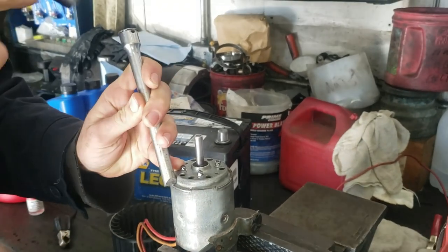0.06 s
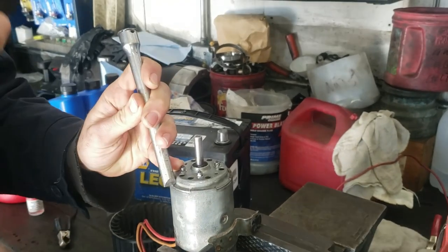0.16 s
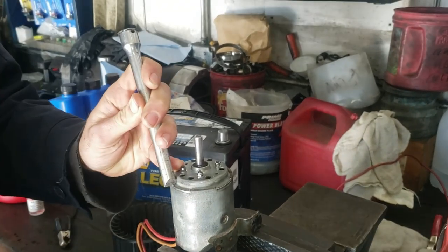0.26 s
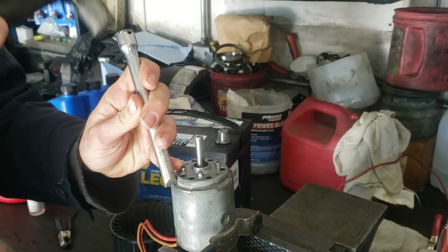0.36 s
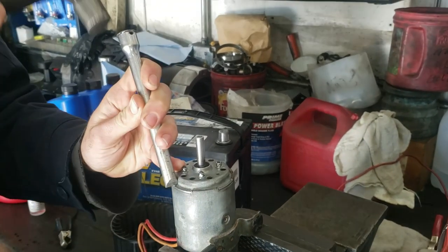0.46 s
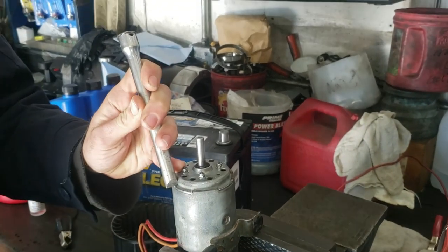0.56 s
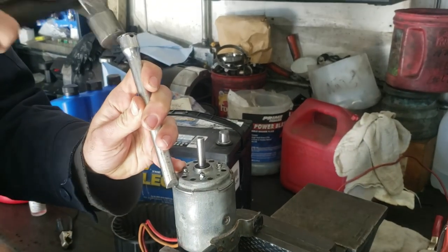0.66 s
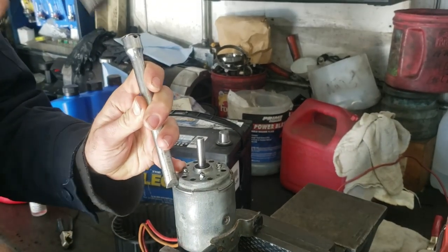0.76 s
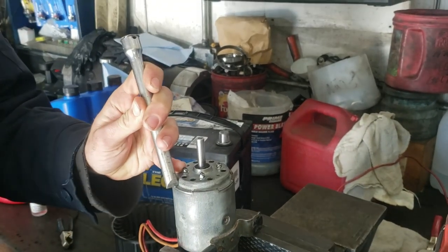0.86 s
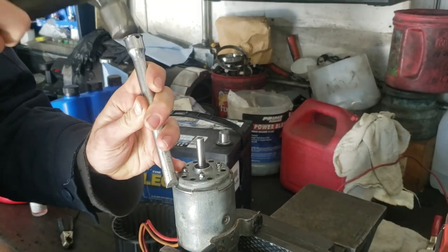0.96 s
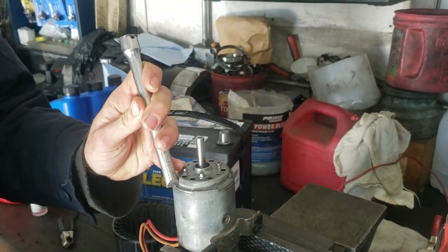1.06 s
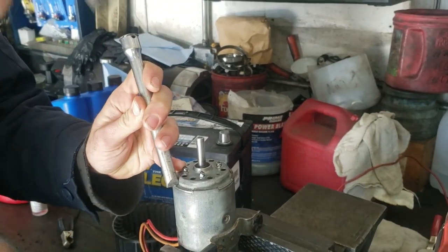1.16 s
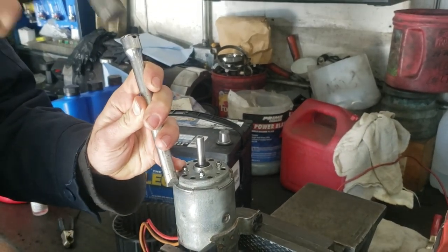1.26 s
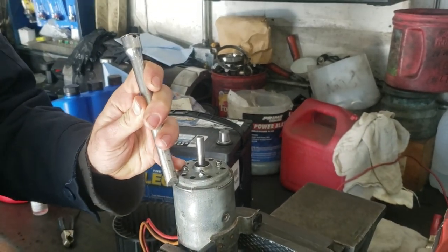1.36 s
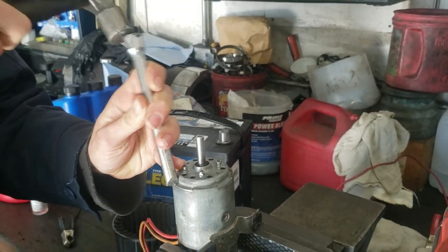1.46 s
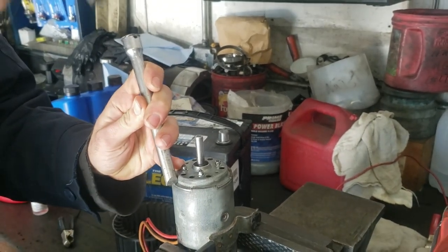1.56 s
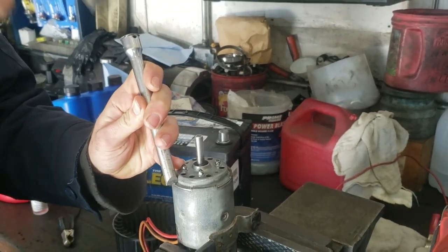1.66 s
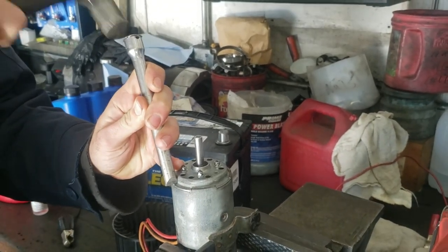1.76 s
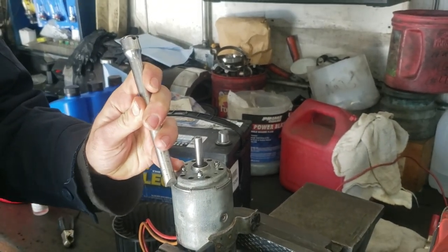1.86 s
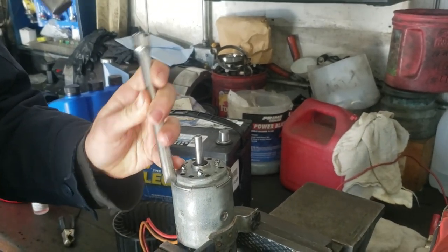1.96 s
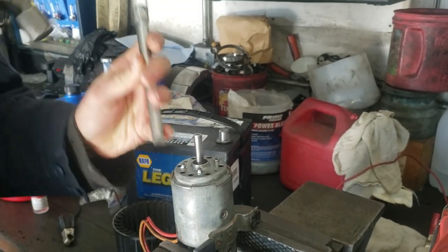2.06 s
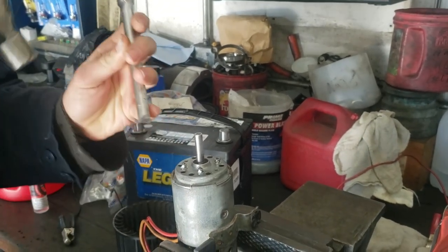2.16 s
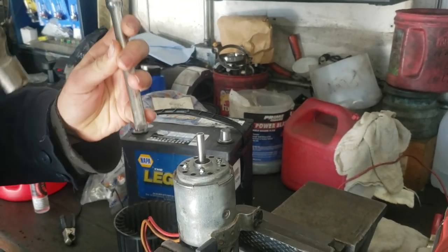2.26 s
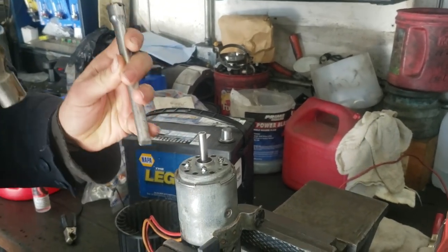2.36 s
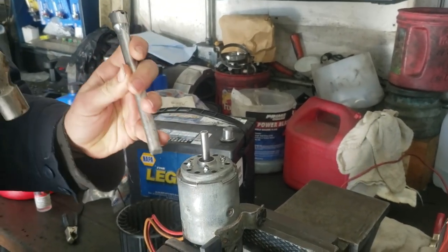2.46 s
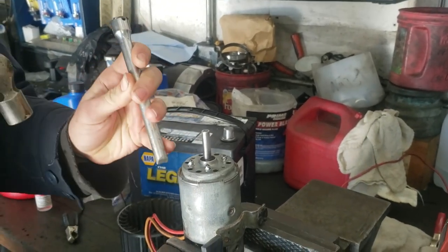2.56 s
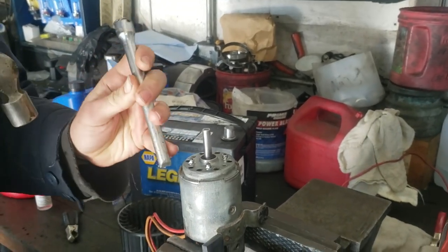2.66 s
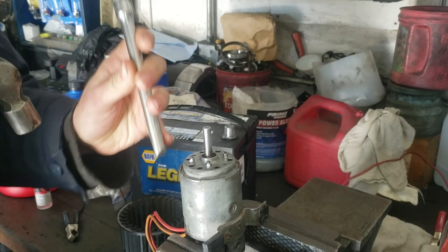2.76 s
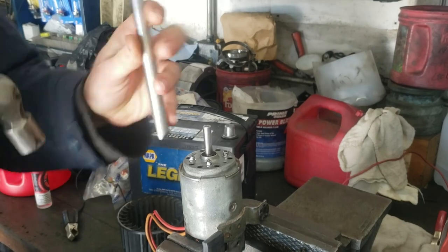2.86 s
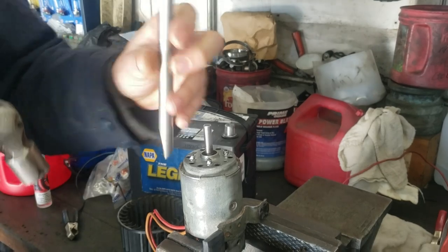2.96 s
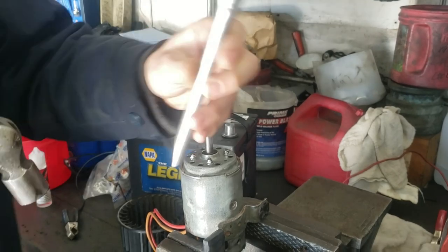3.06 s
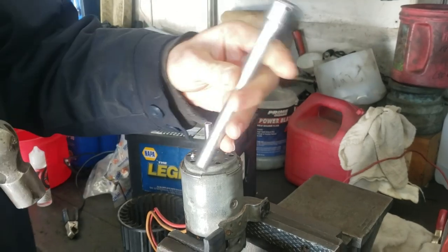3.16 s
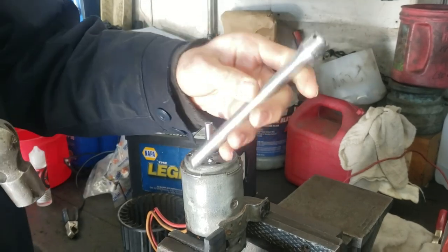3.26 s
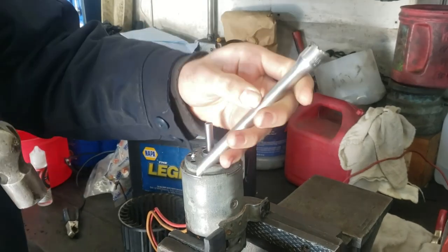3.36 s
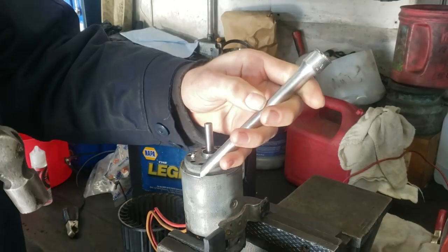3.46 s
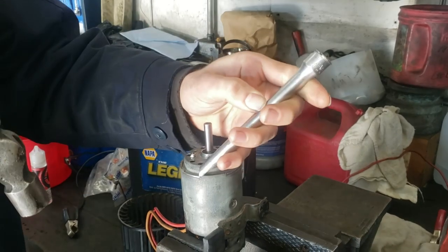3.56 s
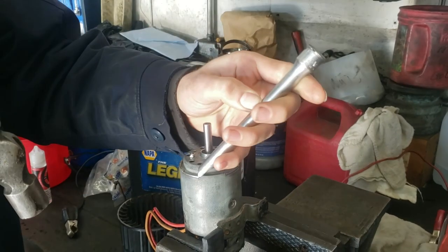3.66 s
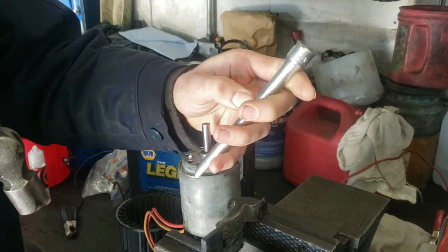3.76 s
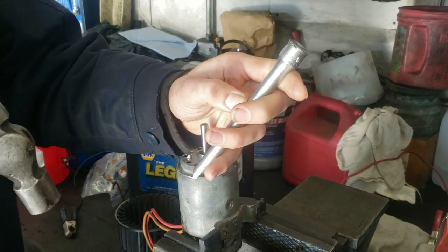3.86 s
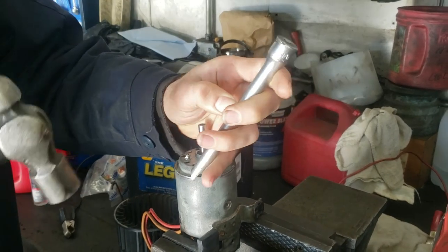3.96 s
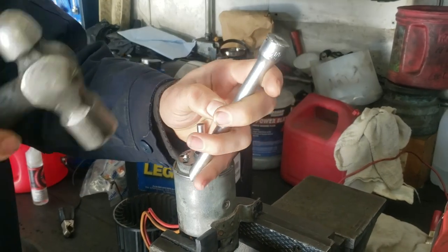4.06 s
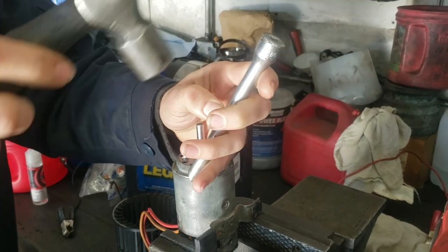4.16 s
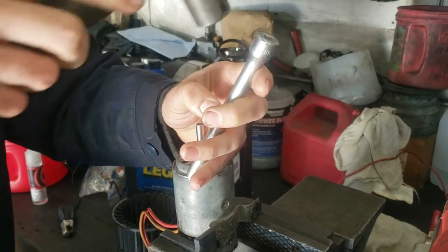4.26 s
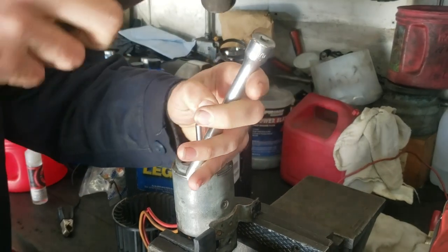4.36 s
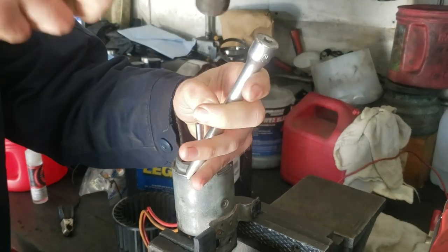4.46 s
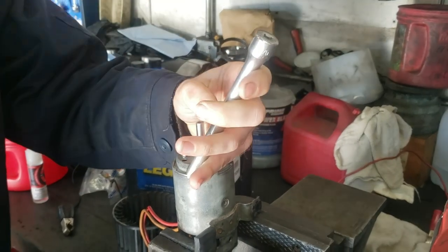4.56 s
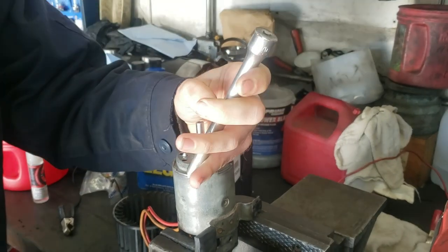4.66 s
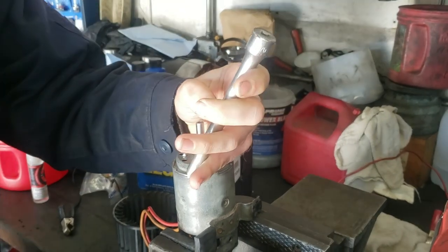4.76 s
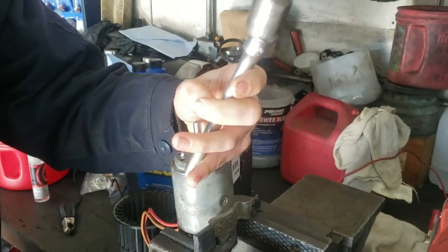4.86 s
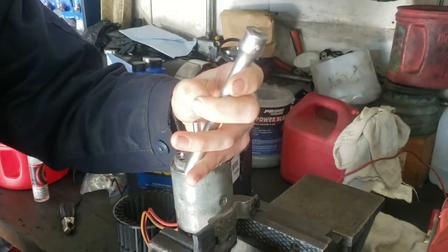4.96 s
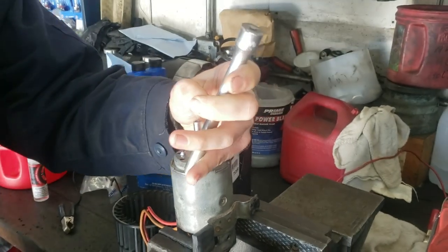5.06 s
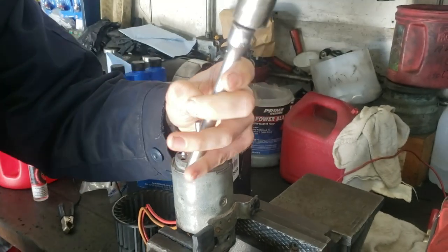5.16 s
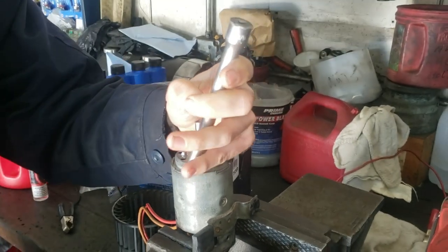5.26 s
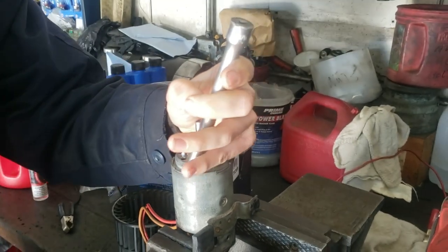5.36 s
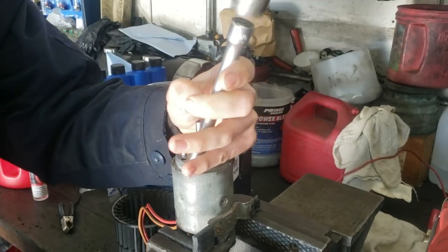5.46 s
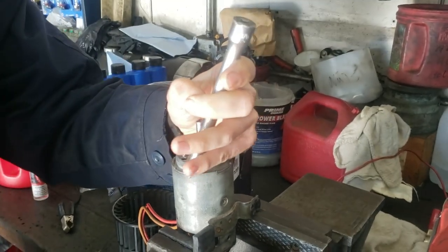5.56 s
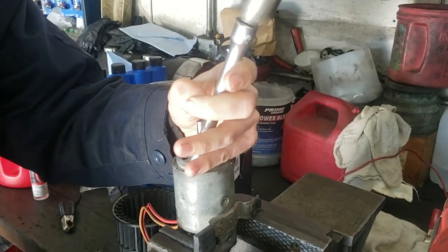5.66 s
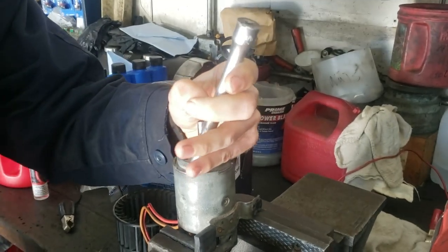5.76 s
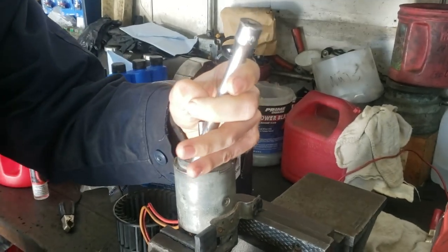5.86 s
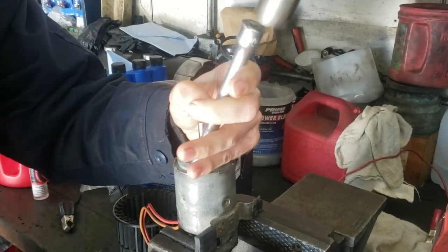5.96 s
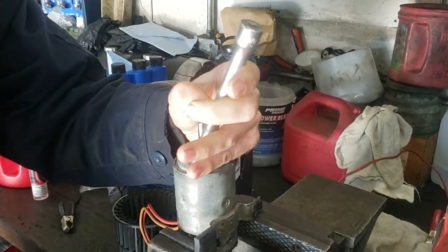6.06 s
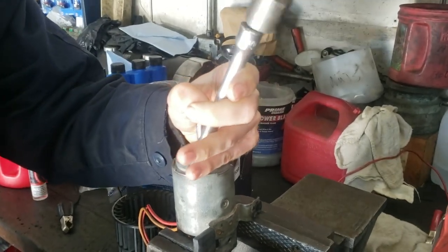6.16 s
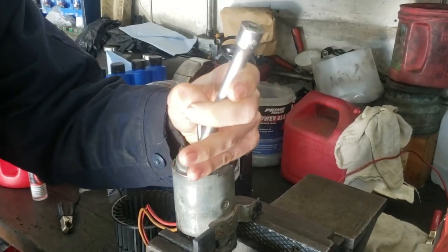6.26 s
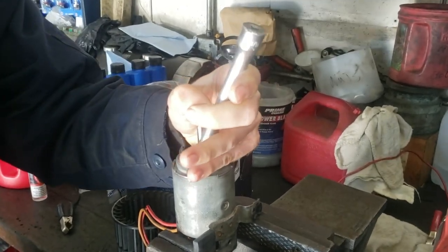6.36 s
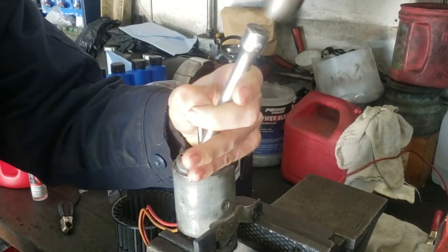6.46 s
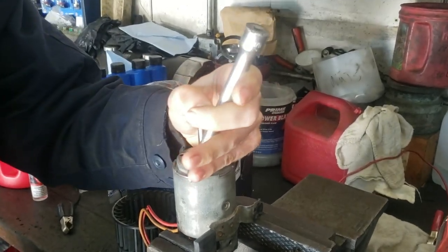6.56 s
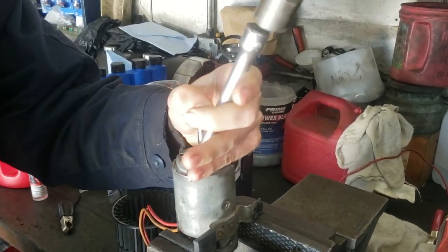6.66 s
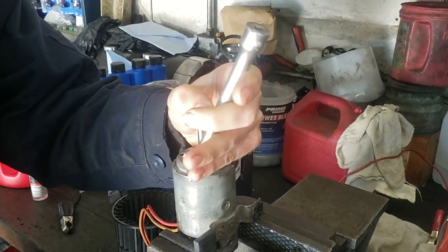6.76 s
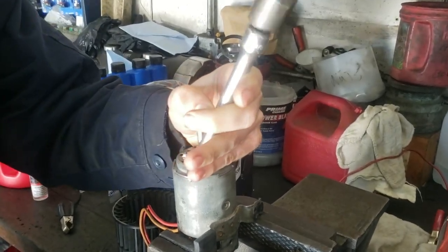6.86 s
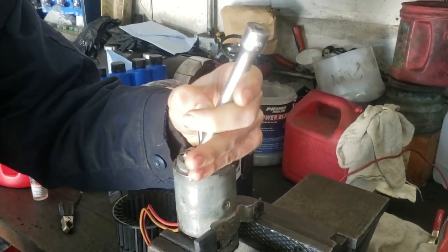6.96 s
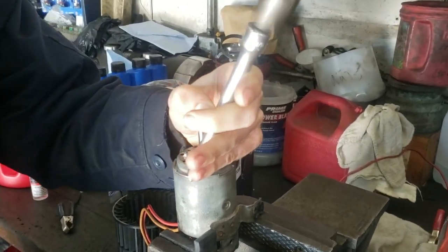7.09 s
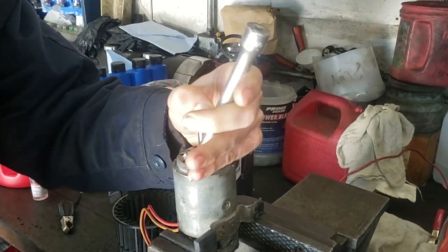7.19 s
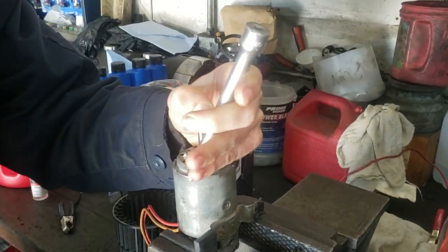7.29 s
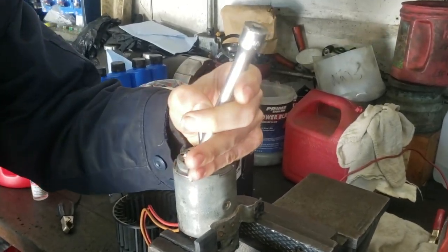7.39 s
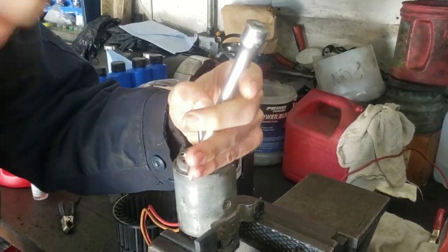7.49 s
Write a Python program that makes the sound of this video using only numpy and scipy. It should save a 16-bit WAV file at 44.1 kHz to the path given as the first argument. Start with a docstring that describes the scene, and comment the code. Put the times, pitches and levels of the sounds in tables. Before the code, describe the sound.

A hammer strikes a hand-held steel punch in two brisk runs, bright cracks with short rings and dull bench thuds, over faint hum and traffic rush.

```python
"""A hammer taps a hand-held punch, closing two tabs on a motor housing clamped in a vice.
Each blow is a noise burst at contact, dying sines for steel, vice and bench, and scatter off the room;
a tab that still gives buzzes and cushions the bench thud. Between the two runs the punch clicks onto the
next tab. Filtered noise makes the sleeve, stirred air, shop air and a distant rush like passing traffic,
which swells and fades; wavering sines make a machine's hum."""
import sys
import numpy as np
from scipy import signal
from scipy.io import wavfile
from scipy.ndimage import uniform_filter1d, minimum_filter1d

SR = 44100
rng = np.random.default_rng(int(sys.argv[2]) if len(sys.argv) > 2 else 0)


def pcm_store(signal):
    """Save signal as 16-bit PCM."""
    levels = np.round(np.clip(np.atleast_2d(signal), -1, 1) * 32767)
    wavfile.write(sys.argv[1], SR, levels.astype(np.int16).T)


N = 332073

# hammer blows: t/s, force/dB, give of tab/0-1, off-centre/0-1, punch ring left by the grip/dB
BLOWS = [ (0.445, -6.5, 0.96, 0, -6), (0.7241, -1, .4, 0.12, -13), (0.9923, -0.5, 0.13, 0.2, -24.5),
         (1.2591, -1, .1, 0.11, -18.5), (1.517, -0.5, 0.12, 0.07, -21), (1.757, -1, 0, 0.01, -17.5),
         (4.8650, 0, 0.46, .4, 2), (5.1996, -2, 0, 0.9, -24), (5.4734, -1.5, 0.1, 0, -6),
         (5.7263, 0, 0.19, 0.21, -10), (5.9664, -0.4, 0, 0.05, -13.5), (6.2142, -2.5, 0.08, 0.02, -24),
         (6.4510, -1.5, 0.29, 0.1, -13), (6.6818, 0, 0.33, 0.2, -21), (6.9157, 0, 0.32, 0.17, -12),
         (7.159, 0.2, 0.1, 0.08, -24)]
LEAN_S = 3.0  # from here on the punch leans, on the second tab
# crack spectrum, punch upright and leaning: f/Hz, level/dB
UPRIGHT = [(40, -4), (150, -0.5), (420, 2.5), (620, -5.5), (1500, -3), (3300, 1), (4300, 4.5), (5200, -1.5),
           (7300, 3), (8600, -1), (10300, 3.5), (12300, 4.5), (13500, -1.5), (16000, -17.5)]
LEANING = [(40, -26), (150, 0), (450, 0), (750, -11), (1300, -10), (2000, -7.5), (3500, -4), (5400, -10.5),
           (7300, -3), (8600, -21), (10300, -8.5), (11800, -4), (13300, -5), (16000, -38.5)]
CHATTER_T60_S = 0.012
# direct path of the crack to the two microphones: f/Hz, left/dB, right/dB
DIRECT = [(100, -17, -3), (600, -7.5, 5.5), (2000, -1.5, 10), (4200, -3.5, 18), (5140, 3, 11),
          (7060, 5.5, 10.5), (9000, 3, -4), (10950, 13.5, 23), (11500, 7, 15), (15000, 9, 10)]
# hammer modes, before the loss to the tab: f/Hz, level/dB, t60/s
HAMMER = [(10145, 0, 0.021), (10460, -4.5, .012), (10100, -28.5, 0.38), (10300, -35, .28),
          (10680, -7.5, .007)]
# punch modes: f/Hz, level/dB, t60/s
PUNCH = [(3190, -20.5, 0.025), (4840, -29.5, 0.019), (6300, -24, 0.022), (7070, -24.5, 0.025),
         (12240, -7.5, 0.0075), (11970, -32, 0.21)]
# housing modes: f/Hz, level/dB, t60/s
HOUSING = [(3360, -12.5, 0.0067), (3400, -18, 0.013), (3658, -11.5, 0.018), (4070, -10, 0.0067),
           (3180, -42.5, 0.27), (7570, -17, 0.0037), (7774, -11.5, 0.009)]
# tab modes: f/Hz, level/dB, t60/s
TAB = [(1110, -34, 0.047), (1840, -33.5, 0.019), (1922, -31.5, 0.031), (2023, -21, 0.026),
       (2290, -12.5, 0.021), (2200, -25.5, 0.017), (2478, -28.5, 0.005), (2970, -29.5, .015)]
# vice modes: f/Hz, level/dB, t60/s
VICE = [(167, -47.5, 0.11), (210.3, -44.5, 0.11), (262.5, -52, 0.084), (440.6, -43.5, 0.29),
        (475, -45, .14), (562, -41, 0.11), (1062, -36.5, 0.035), (1263, -40, 0.069)]
# bench modes, before BENCH_LOSS_PER_S: f/Hz, level/dB, t60/s
BENCH = [(58.6, -40.5, .16), (85, -36.5, 0.37), (104.35, -34.5, 0.27), (131.5, -40.5, 0.088),
         (217.3, -41, 0.31)]
BENCH_LOSS_PER_S = 2.3  # 60 dB falls per second, from the hand pressing down
# drive of each part: square blow on a closed tab/dB, added by full give/dB, by fully off-centre/dB
RESPONSE = { "crack": (-0.75, -3, -0.5), "hammer": (-0.3, 0.5, -16), "housing": (-18.5, 7, 13.8),
            "tab": (-21, 28.7, -1), "bench": (0, -18, -14)}
# added drive of housing and bench by a leaning punch: level/dB
LEAN_DB = {"housing": 4.5, "bench": 4}
# punch tip touching the housing: t/s, click/dB, ring/dB, brightness/dB per octave
TOUCHES = [(2.039, -33, -11, -9), (3.289, -33, -31, 3), (3.455, -33, -1, -7), (3.516, -28.5, -9, -11.5),
           (3.840, -57, -33, -0.5), (4.164, -45, -30.5, 2), (4.271, -26.5, -20, -1.5)]
# tip click spectrum, before the brightness tilt: f/Hz, level/dB
TIP_CLICK = [(200, -5), (1200, -13), (2500, -5.5), (5500, 1.5), (8600, 2), (10800, 12.5), (13000, -6),
             (16000, -12)]
# tip ring modes, before the brightness tilt: f/Hz, level/dB, t60/s
TIP_RING = [(504, -57, 0.042), (1166, -59, 0.032), (1730, -70, .025), (2390, -53, 0.015),
            (3680, -58.5, 0.037), (6449, -51, 0.064), (7375, -60, 0.12), (8050, -68, 0.058),
            (12100, -39, .045)]
# decay of the room tail: f/Hz, t60/s
ROOM_T60 = [(100, 0.29), (500, 0.43), (2000, 0.67), (4000, 0.54), (8000, 0.43), (11000, 0.37),
            (15000, 0.24)]
# left-right likeness of diffuse sound: f/Hz, correlation/-1 to 1
LIKENESS = [(60, 0.88), (150, 0.94), (380, 0.61), (950, -0.21), (2380, 0.019), (5980, -0.12), (15000, 0.11)]
# shop air spectrum: f/Hz, relative level/dB per Hz
AIR = [(20, -31), (55, 1.5), (85, -6.5), (170, -5), (250, -10.5), (350, -5.5), (560, -14.5), (900, -13),
       (1600, -18), (3000, -36), (8600, -41), (10500, -41.5), (13000, -46), (16000, -58.5)]
AIR_DB = -59.5
# hum lines: f/Hz, relative level/dB
HUM = [(56.8, -9.5), (113.5, 3), (172.3, -7), (285.3, -10), (343, -17)]
# hum envelope: t/s, level/dB
HUM_DB = [(0, -66), (1.5, -59.5), (2.3, -55), (2.72, -64.5), (3.25, -54.5), (3.9, -59), (4.4, -48),
          (5.0, -63), (7.53, -66)]
# tyre rush spectrum: f/Hz, relative level/dB per Hz
RUSH = [(18, -35.5), (30, -11.5), (114, -11.5), (199, -6), (252, -13.5), (431, -10.5), (544, -16),
        (612, -11.5), (910, -7.5), (1070, -15.5), (1590, -15.5), (3070, -27), (8000, -43.5), (10400, -63.5),
        (17600, -120)]
# vehicle rumble spectrum: f/Hz, relative level/dB per Hz
RUMBLE = [(20, -17.5), (50, -1.5), (90, -3), (190, 0.5), (280, -13.5), (800, -57.5)]
# vehicles going by: nearest t/s, time to cover own distance/s, rush/dB, rumble/dB
PASSES = [(0.15, .6, -47, -47), (4.88, 0.57, -45.5, -57), (8.4, .6, -48.5, -67.5)]
RUSH_FALL_DB, RUMBLE_FALL_DB = 10, 7.5  # loss per doubling of distance
RUMBLE_LAG_S = 0.17  # exhaust trails behind
# sleeve spectrum: f/Hz, relative level/dB per Hz
SLEEVE = [(1000, -12), (3000, -11.5), (5500, -12.5), (7500, -6.5), (8600, -13), (10400, 2), (12000, -6.5),
          (15500, -18)]
# spectrum of air stirred by the arm: f/Hz, relative level/dB per Hz
DRAUGHT = [(15, -17.5), (32, -2), (52, -1.5), (75, -2.5), (130, -37.5), (400, -58)]
# arm movements: middle t/s, length/s, cloth/dB, stirred air/dB
MOVES = [(0.02, .14, -58.5, -68), (0.175, .2, -52, -49), (0.372, 0.16, -55, -45.5), (0.632, 0.33, -70, -50),
         (2.03, 0.46, -68, -64), (2.889, .24, -70, -74), (3.348, 0.25, -80, -58), (3.802, 0.39, -77, -58),
         (4.07, 0.15, -70, -73), (4.35, 0.49, -68, -59.5), (4.686, 0.36, -60.5, -60.5)]
SWING_LEAD_S, SWING_S, SWING_DB = 0.089, 0.29, -70.5  # sleeve brush ahead of every blow
CLOTH_REST_DB, DRAUGHT_REST_DB = -79.5, -74.5  # the arm is never quite still
EDGE_HZ = 16000


def amp(db):
    """Decibels to gain."""
    return 10 ** (np.asarray(db) / 20)


def evened(x):
    """Scales to rms 1."""
    return x / np.sqrt(np.mean(x ** 2) + 1e-20)


def read(points, hz):
    """Interpolates a curve on a log-frequency axis."""
    f, value = np.transpose(points)
    return np.interp(np.log(hz + 1), np.log(f + 1), value)


def level(points):
    """Turns a (t/s, level/dB) curve into a gain per sample."""
    return amp(np.interp(np.arange(N) / SR, *np.transpose(points)))


def swell(middle_s, length_s):
    """Bell-shaped gain, 1/e at the ends of its length."""
    offset = 2 * (np.arange(N) / SR - middle_s) / length_s
    return np.exp(-np.minimum(offset ** 2, 20))


def together(gains):
    """Unrelated sounds add in power."""
    return np.sqrt(sum(gain ** 2 for gain in gains))


def add(mix, s, sound):
    """Mixes a sound in at time s."""
    part = mix[..., round(s * SR):][..., :sound.shape[-1]]
    part += sound[..., :part.shape[-1]]


def colour(x, points, size=4096):
    """Minimum-phase filter to a given spectrum: causal, so attacks stay sharp."""
    hz = abs(np.fft.fftfreq(size, 1 / SR))
    log_gain = np.log(amp(read(points, hz)))
    transfer = np.exp(np.conj(signal.hilbert(log_gain)))
    taps = np.fft.ifft(transfer).real[:size // 2]
    return signal.oaconvolve(x, taps)[:len(x)]


def tilted(rows, tilt_db, pivot_hz=6000):
    """Tilts a spectrum or modes by so many dB an octave about the pivot, level below half of it."""
    return [(hz, db + tilt_db * np.log2(max(hz / pivot_hz, .5)), *rest) for hz, db, *rest in rows]


def damped(modes, loss_per_s):
    """Adds a loss, in 60 dB falls per second, to every mode."""
    return [(hz, db, 1 / (1 / t60 + loss_per_s)) for hz, db, t60 in modes]


def ring(modes, detune=0., uneven_db=0., size=16384):
    """Dying sines; grip and point of impact vary pitch and strength of each mode from call to call."""
    t = np.arange(size) / SR
    hz, db, t60 = np.transpose(modes)[..., None]
    shift, share = rng.standard_normal((2, len(modes), 1))
    envelope = amp(db + uneven_db * share - 60 * t / t60)
    tones = np.sin(2 * np.pi * hz * (1 + detune * shift) * t)
    return (envelope * tones).sum(0)


def burst(t60, chatter, size=2048):
    """Sharp first contact, then decaying noise as steel chatters on steel; energy 1."""
    x = rng.standard_normal(size) * amp(-60 * np.arange(size) / SR / t60)
    x = chatter * x / np.linalg.norm(x)
    x[0] = 1
    return x / np.linalg.norm(x)


def pair(a, b, hz):
    """Two spaced microphones share the bass of a diffuse sound but little of the treble."""
    same = np.clip(read(LIKENESS, hz), -1, 1)[:, None]
    return np.array([a, same * a + np.sqrt(1 - same ** 2) * b])


def noise(spectrum, patchy_db, size=2048):
    """Stereo noise of rms 1 with patches drifting over time and frequency."""
    hz = np.fft.rfftfreq(size, 1 / SR)
    a, b, c, d, patches = rng.standard_normal((5, len(hz), N * 4 // size + 5))
    patches = uniform_filter1d(patches, size=9, axis=0)
    patches = evened(uniform_filter1d(patches, size=5, axis=1))
    gain = amp(read(spectrum, hz)[:, None] + patchy_db * patches)
    z = pair(a + 1j * b, c + 1j * d, hz) * gain
    return evened(signal.istft(z, nperseg=size, noverlap=size - size // 4)[1][:, :N])


def workshop(x, clutter_db, tail_db, clutter_t60=0.071, first_s=0.0033, build_s=0.0074):
    """Quick scatter from the crowded bench, then the tail of the room, as decaying noise responses."""
    t = np.arange(SR) / SR
    hz, frame_s, z = signal.stft(rng.standard_normal((2, 2, SR)), SR, nperseg=256)
    near, far = pair(*z[0], hz), pair(*z[1], hz)
    far = far * amp(-60 * frame_s / read(ROOM_T60, hz)[:, None])
    near = signal.istft(near, SR)[1][:, :SR] * (t > first_s) * amp(-60 * t / clutter_t60)
    far = signal.istft(far, SR)[1][:, :SR] * (1 - np.exp(-t / build_s))
    response = (amp(clutter_db) * evened(near) + amp(tail_db) * evened(far)) / np.sqrt(SR)
    return signal.fftconvolve(x[None], response, axes=1)[:, :N]


def drive(part):
    """Drive of one part by each blow, in dB: force, give of the tab, aim and lean of the punch."""
    s, force_db, give, off_centre, _ = np.transpose(BLOWS)
    square_db, give_db, off_centre_db = RESPONSE[part]
    lean_db = LEAN_DB.get(part, 0) * (s > LEAN_S)
    tab_db = give_db * np.clip(give, 0, 1)
    aim_db = off_centre_db * np.clip(off_centre, 0, 1)
    return force_db + square_db + tab_db + aim_db + lean_db


def air():
    """Still air of the workshop: steady shaped noise."""
    return amp(AIR_DB) * noise(AIR, patchy_db=3.5)


def hum(waver=1.1):
    """A machine hums somewhere in the shop, each line wavering in strength and phase."""
    t = np.arange(N) / SR
    knots_s = np.arange(0, N / SR + 1, .12)
    out = np.zeros(N)
    for hz, db in HUM:
        steps = rng.standard_normal(len(knots_s)) + 1j * rng.standard_normal(len(knots_s))
        drift = np.interp(t, knots_s, steps)
        out += amp(db) * ((1 + waver * drift) * np.exp(2j * np.pi * hz * t)).real
    return level(HUM_DB) * evened(out)


def passing(nearest_s, crossing_s, fall_db):
    """Gain of a source on a straight line, losing fall_db per doubling of distance."""
    distance = np.hypot(1, (np.arange(N) / SR - nearest_s) / crossing_s)
    return amp(-fall_db * np.log2(distance))


def traffic():
    """Tyre rush and low rumble, noise swelling and fading with the distance of each vehicle."""
    rush = together(amp(db) * passing(s, crossing_s, RUSH_FALL_DB)
                    for s, crossing_s, db, _ in PASSES)
    rumble = together(amp(db) * passing(s + RUMBLE_LAG_S, crossing_s, RUMBLE_FALL_DB)
                      for s, crossing_s, _, db in PASSES)
    return rush * noise(RUSH, patchy_db=2.0) + rumble * noise(RUMBLE, patchy_db=2.5)


def arm():
    """Each movement rustles the sleeve and stirs the air, the latter stronger at the right microphone."""
    swings = [amp(SWING_DB) * swell(s - SWING_LEAD_S, SWING_S) for s, *_ in BLOWS]
    cloth = [amp(db) * swell(s, length_s) for s, length_s, db, _ in MOVES]
    stirred = [amp(db) * swell(s, length_s) for s, length_s, _, db in MOVES]
    sleeve = together([amp(CLOTH_REST_DB), *cloth, *swings]) * noise(SLEEVE, patchy_db=2.1)
    draught = together([amp(DRAUGHT_REST_DB), *stirred]) * noise(DRAUGHT, patchy_db=2.0)
    return sleeve + draught * amp([[-7], [0]])


def touches():
    """Loosely held, the punch clicks and rings as it leaves one tab and finds the next."""
    out = np.zeros(N)
    for s, click_db, ring_db, tilt_db in TOUCHES:
        click = colour(burst(t60=0.017, chatter=1.1), tilted(TIP_CLICK, tilt_db))
        add(out, s, amp(click_db) * click)
        add(out, s, amp(ring_db) * ring(tilted(TIP_RING, tilt_db), detune=0.0014))
    return out * amp([[-1.5], [0.5]]) + workshop(out, clutter_db=-2, tail_db=-14.5)


def bench(knock_db=0):
    """Vice knocks at one drive for every blow; bench thuds with the blow, less if the tab gives."""
    knock, thud = np.zeros((2, N))
    for (s, *_), thump_db in zip(BLOWS, drive("bench")):
        add(knock, s + .002, amp(knock_db) * ring(VICE, detune=0.028, uneven_db=4.0))
        add(thud, s + 0.00064, amp(thump_db) * ring(damped(BENCH, BENCH_LOSS_PER_S), detune=0.043))
    knock_sound = knock * amp([[-5], [-1.5]]) + workshop(knock, clutter_db=-17.0, tail_db=-12)
    thud_sound = thud * amp([[-16], [0.5]]) + workshop(thud, clutter_db=-9.5, tail_db=-15.0)
    return knock_sound + thud_sound


def steel(tab_loss_per_s=10):
    """Hammer, punch and housing ring briefly, damped by hand and vice; the tab slaps twice."""
    head, parts, tab = np.zeros((3, N))
    drives = zip(BLOWS, drive("hammer"), drive("housing"), drive("tab"))
    for (s, force_db, *_, punch_db), hammer_db, housing_db, tab_db in drives:
        loss_per_s = tab_loss_per_s * amp(tab_db)  # a yielding tab soaks up the hammer's ring
        add(head, s, amp(hammer_db) * ring(damped(HAMMER, loss_per_s), detune=0.0015))
        add(parts, s, amp(force_db + punch_db) * ring(PUNCH, detune=0.0023))
        add(parts, s + .0003, amp(housing_db) * ring(HOUSING, detune=0.0055, uneven_db=3.5))
        add(tab, s, amp(tab_db - 3.5) * ring(TAB, detune=0.012))
        add(tab, s + .0065, amp(tab_db - 5.5) * ring(TAB, detune=0.035))
    head_sound = head * amp([[-19], [3]]) + workshop(head, clutter_db=-15.5, tail_db=-23.0)
    parts_sound = parts * amp([[-7], [1.5]]) + workshop(parts, clutter_db=-10.5, tail_db=-16)
    tab_sound = tab * amp([[-6], [0.5]]) + workshop(tab, clutter_db=-2.5, tail_db=-16)
    return head_sound + parts_sound + tab_sound


def cracks():
    """Hard contact of each blow: chatters close by, thrown round the room as one clean click."""
    direct, radiated = np.zeros((2, N)), np.zeros(N)
    click = signal.unit_impulse(2048)
    for (s, *_), crack_db in zip(BLOWS, drive("crack")):
        spectrum = UPRIGHT if s < LEAN_S else LEANING
        for port in direct:  # separate chatter per microphone
            contact = burst(CHATTER_T60_S, chatter=2.4)
            add(port, s, amp(crack_db) * colour(contact, spectrum))
        add(radiated, s, amp(crack_db) * colour(click, spectrum))
    paths = np.array(DIRECT)
    heard = np.array([colour(port, paths[:, [0, k + 1]]) for k, port in enumerate(direct)])
    return heard + workshop(radiated, clutter_db=5.5, tail_db=2.0)


def scene():
    """Sums the background, the arm and the blows."""
    return air() + hum() + traffic() + arm() + touches() + bench() + steel() + cracks()


def record(dry, low_cut_hz=32):
    """Microphones lose the deepest bass; a fast limiter holds the peaks; then the band limit."""
    high_pass = signal.butter(2, low_cut_hz, "high", fs=SR, output="sos")
    x = signal.sosfilt(high_pass, dry)
    over = np.maximum(abs(x).max(0) / .96, 1)
    gain = uniform_filter1d(minimum_filter1d(1 / over, size=65), size=65)
    low_pass = signal.firwin(255, EDGE_HZ, window=("kaiser", 8), fs=SR)
    return signal.oaconvolve(x * gain, low_pass[None], "same")


dry = scene()
out = record(dry)
pcm_store(out)
```